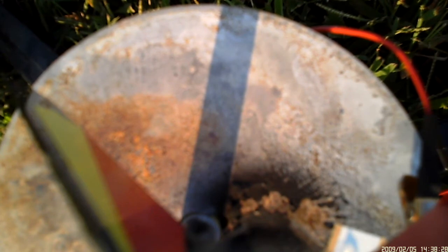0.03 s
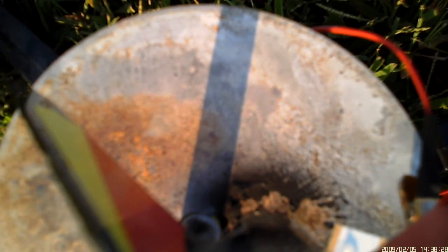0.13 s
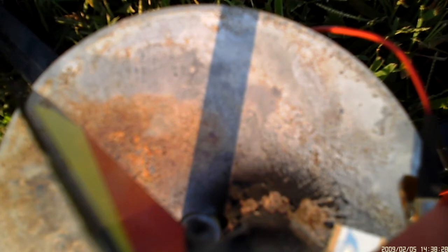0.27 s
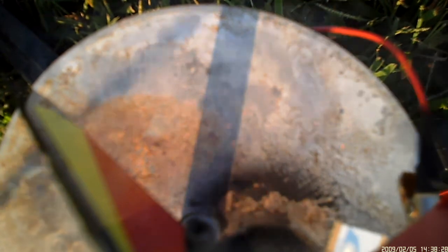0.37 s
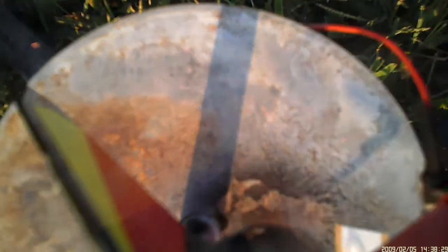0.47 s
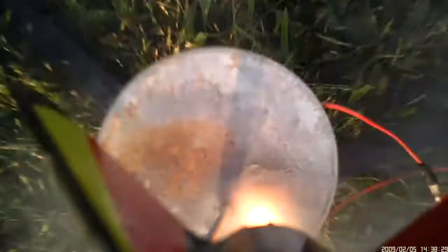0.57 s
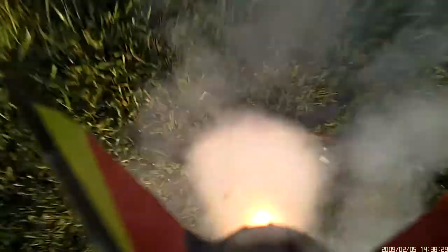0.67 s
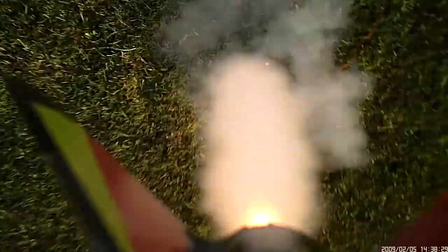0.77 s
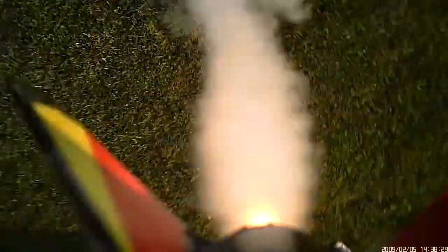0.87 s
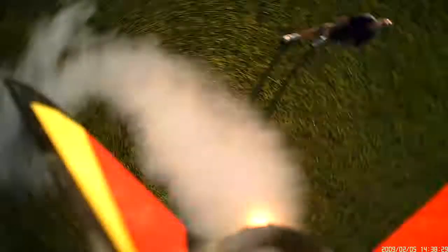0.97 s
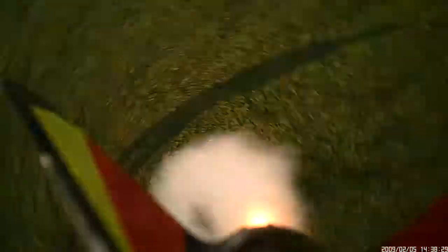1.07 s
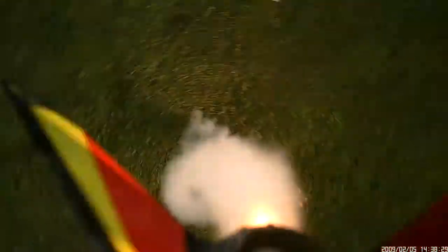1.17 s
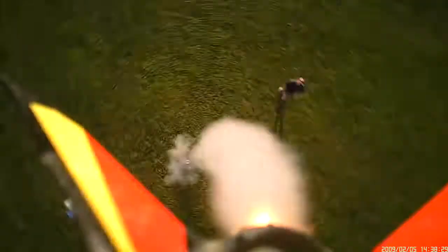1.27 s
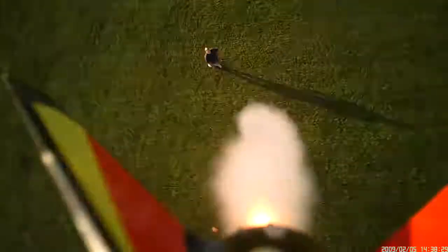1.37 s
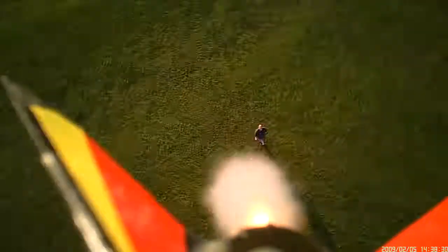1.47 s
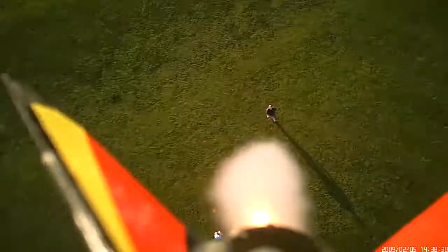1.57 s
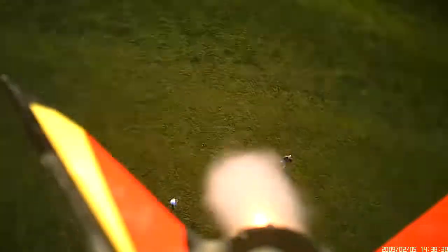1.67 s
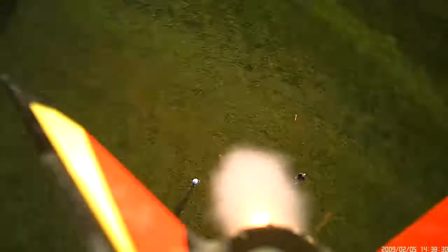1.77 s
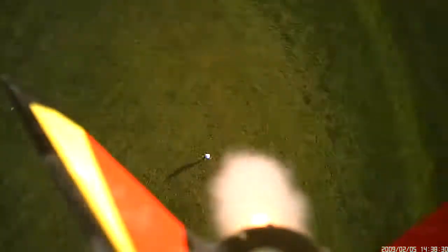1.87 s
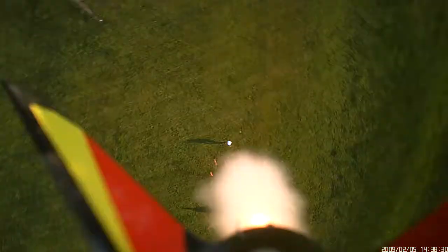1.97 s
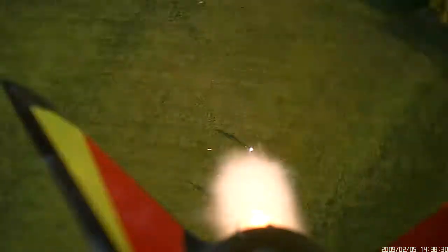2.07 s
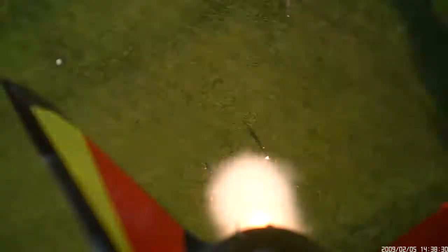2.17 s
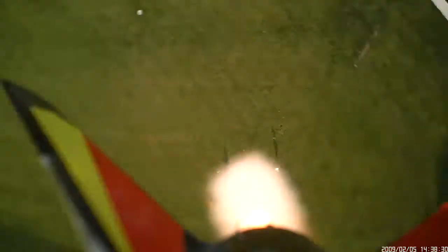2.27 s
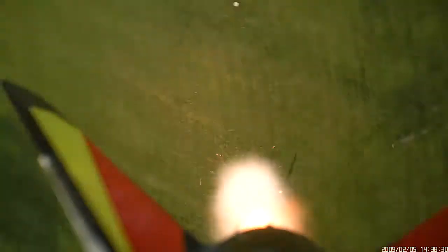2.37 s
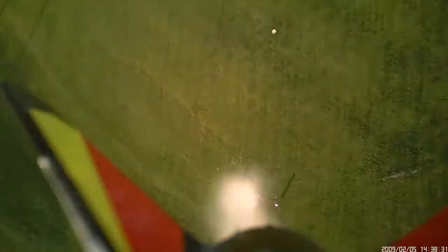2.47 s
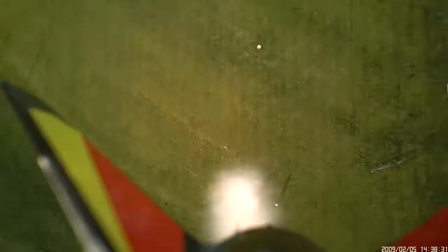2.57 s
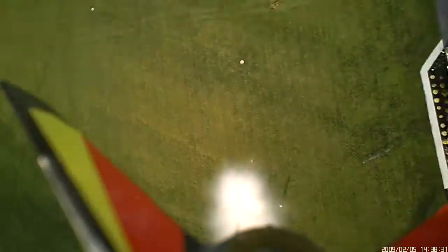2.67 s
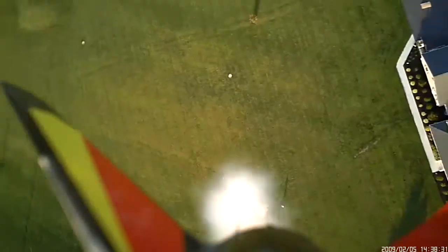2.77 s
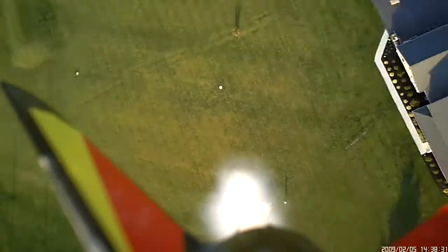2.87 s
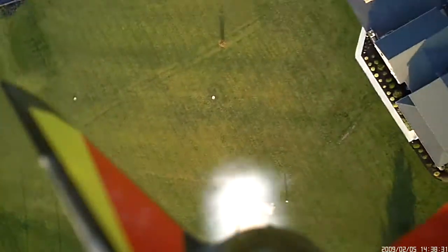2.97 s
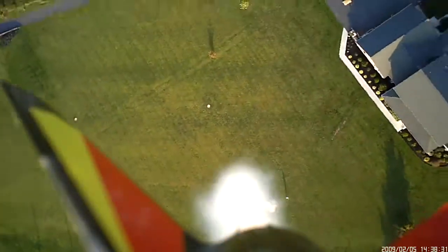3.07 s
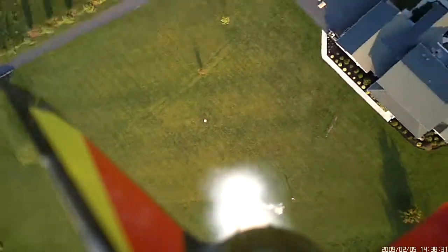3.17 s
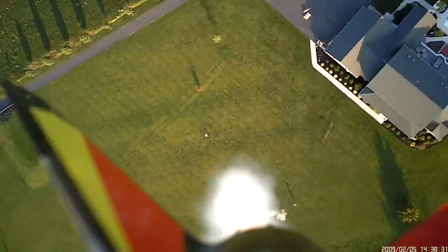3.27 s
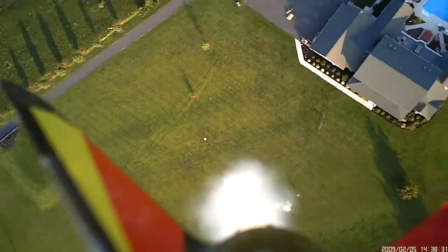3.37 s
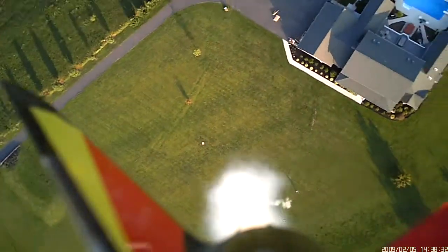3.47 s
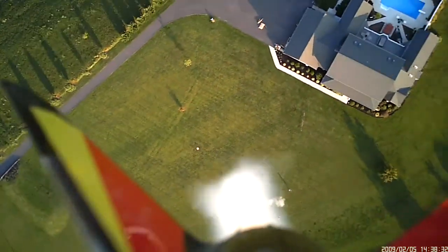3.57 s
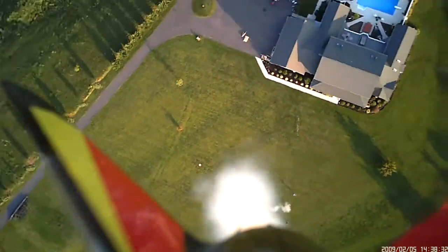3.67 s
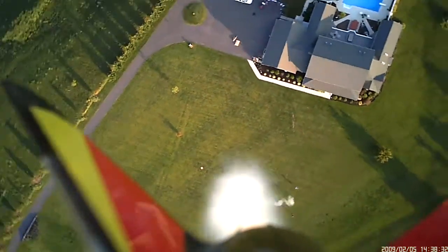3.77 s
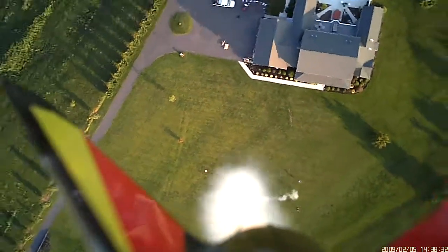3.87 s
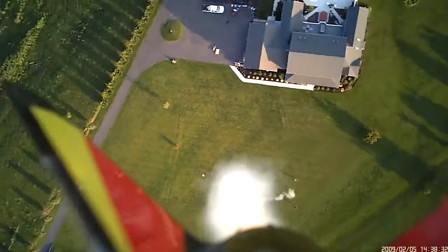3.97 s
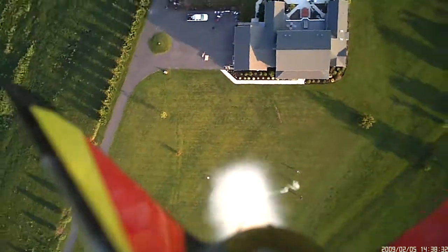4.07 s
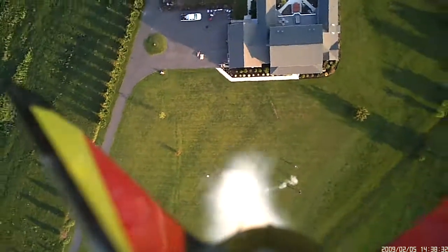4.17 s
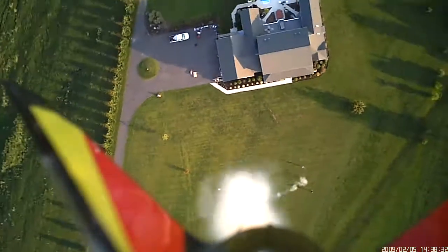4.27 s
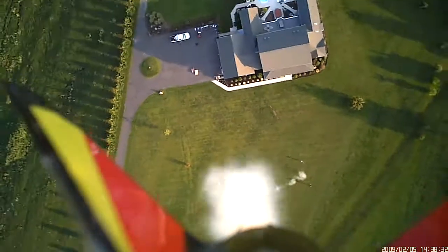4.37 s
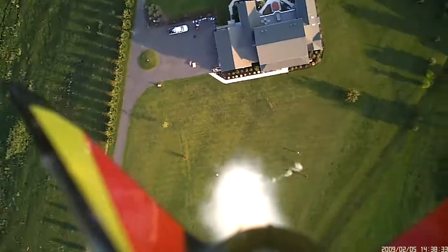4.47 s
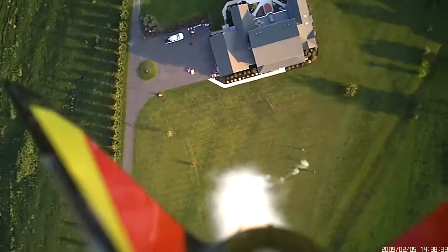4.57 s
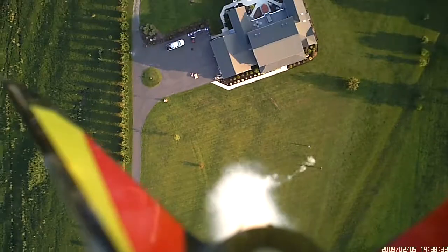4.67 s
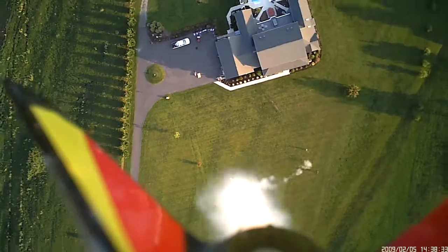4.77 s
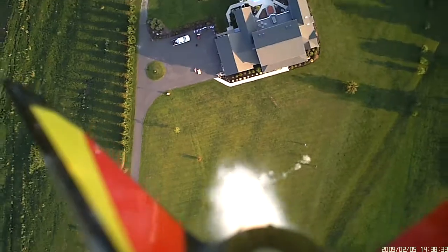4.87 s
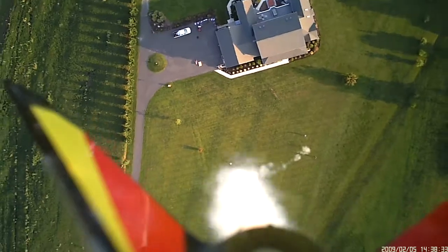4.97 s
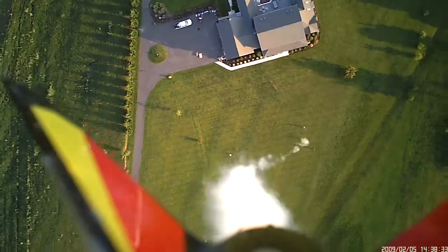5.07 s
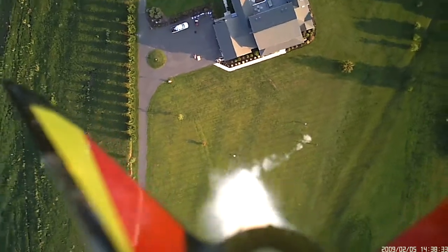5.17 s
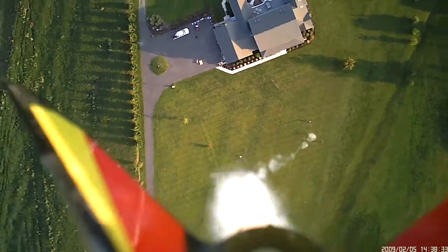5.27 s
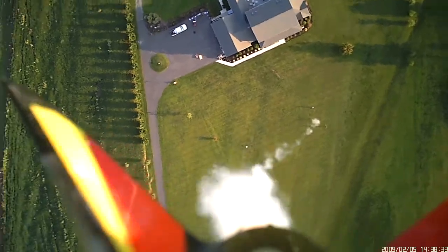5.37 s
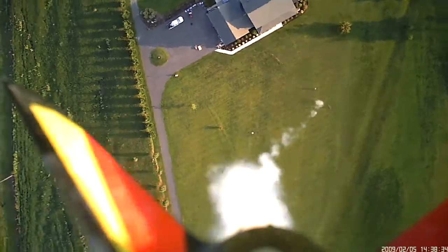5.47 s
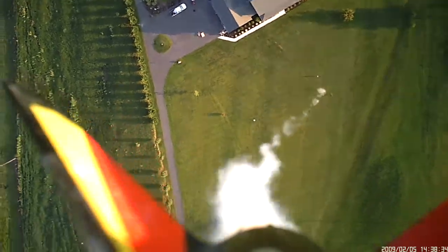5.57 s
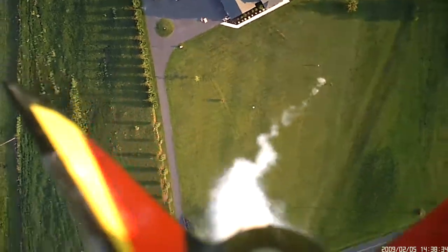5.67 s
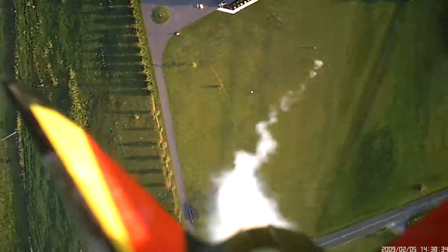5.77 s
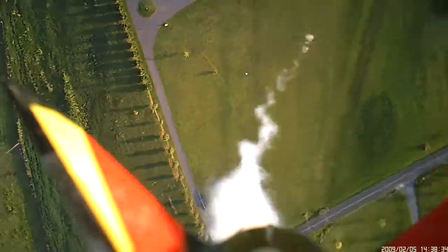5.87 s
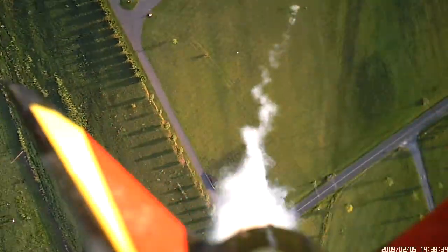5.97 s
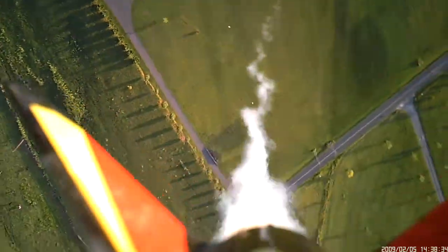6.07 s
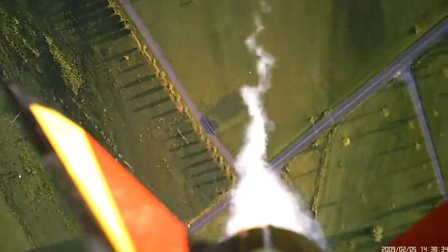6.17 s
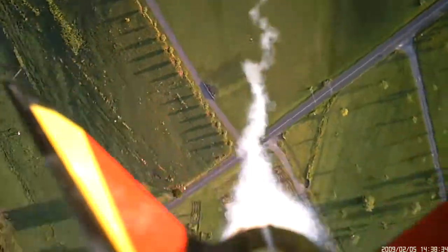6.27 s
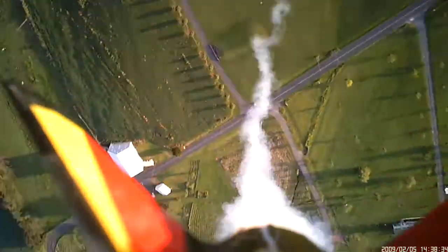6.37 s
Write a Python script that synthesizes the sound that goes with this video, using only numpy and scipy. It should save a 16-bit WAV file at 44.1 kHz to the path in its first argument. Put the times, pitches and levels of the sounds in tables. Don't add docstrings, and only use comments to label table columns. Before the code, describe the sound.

A model rocket igniter spits and bangs, then harsh hiss swells into a clipped, buffeting wind roar that dulls and fades as the rocket slows.

```python
import sys
import numpy as np
from scipy import signal
from scipy.fft import rfft, irfft
from scipy.io import wavfile
from scipy.ndimage import uniform_filter1d

SR = 44100
rng = np.random.default_rng(int(sys.argv[2]) if len(sys.argv) > 2 else 0)


def wrap_up_sound(samples):
    columns = np.atleast_2d(samples).T
    tamed = np.clip(columns, -1, 1)
    steps = np.round(tamed * 32767).astype(np.int16)
    wavfile.write(sys.argv[1], SR, steps)


def nominal_scale(level):
    x = np.asarray(level, float) / 20
    return 10 ** x


N = 283033

# frequency_hz [Hz], level_db [dB per Hz]
ROAR_SPECTRUM = [(30, -1.5), (300, -4), (700, -1.5), (1600, 1), (2200, -1.5), (4000, -8.5), (8000, -17),
                 (14500, -30), (16000, -38)]
# centre_hz [Hz], width_hz [Hz], gain_db [dB]
PORT_MODES = [(1490, 1970, 4.5), (2576, 1380, -10.5), (3820, 600, 4.5), (6130, 220, 0.5), (7680, 690, 8.5),
              (9830, 300, 8), (12600, 500, 0), (13800, 900, 11)]
# start_s [s], length_s [s], centre_hz [Hz], width_hz [Hz], gain_db [dB]
SURGE = (0.96, 0.27, 610, 1000, 10.8)
# time_s [s], level_db [dB]
RUSH = [(.345, -25.5), (.5, -16), (.555, -9), (.57, -5.5), (.75, -9.5), (.9, -6.5), (1.1, -2), (1.45, -0.5),
        (1.75, 2), (2.7, 2.5), (3, 0.6), (3.6, -3), (4.2, -7.5), (4.8, -13.5), (5.3, -16.5), (5.7, -16.5),
        (6.2, -14.5), (6.42, -24)]


def roar(t):
    hz, frames = stft_grid(512)
    yaw_db = -4 * ramp(frames, 5.2, 0.2)
    slope_db = -3.5 + 0.5 * curve(RUSH, 1, frames) + yaw_db
    slope_db = np.maximum(slope_db, -19)
    port_db = bells_db(PORT_MODES, hz) * np.clip(0.55 - 0.051 * slope_db, 0, 1.05)

    surge_s, surge_length_s = SURGE[:2]
    surge_decay = np.exp(-(np.maximum(frames - surge_s, 0) / surge_length_s) ** 2)
    surge_db = bells_db([SURGE[2:]], hz) * ramp(frames, surge_s, 0.03) * surge_decay

    treble_db = (slope_db + 4.2) * np.log2(np.maximum(hz / 1900, 1))
    colour_db = spectrum_db(ROAR_SPECTRUM, hz) + port_db + surge_db + treble_db
    rush = turbulence(colour_db, (600, 2200), 0.63, 0.44, 26, size=512)

    tip_s = 5.68
    lee_db = -9 * ramp(t, tip_s, 0.14) - 17 * np.maximum(t - tip_s, 0)
    steady_suction = 0.03
    return (rush - steady_suction) * nominal_scale(curve(RUSH, 1, t) + lee_db + 0.43)


# frequency_hz [Hz], level_db [dB per Hz]
BUFFET_SPECTRUM = [(10, 0), (40, -1.5), (100, -1.5), (250, -5.5), (500, -10), (1000, -17), (3000, -64),
                   (16000, -80)]
# time_s [s], height [full scale], length_s [s]
LURCHES = [
    (.944, -1.0, .036),
    (.969, 1.15, .022),
    (1.0, -.45, .025),
    (1.035, .5, .03),
    (1.22, .5, .02),
    (5.805, .3, .012),
    (6.076, .25, .012),
    (6.117, .15, .012),
]


def buffeting(t):
    hz, frames = stft_grid(2048)
    deep_db = gusts_db(frames, column=3) * np.log2(np.maximum(300 / (hz + 10), 1))
    lumps = turbulence(spectrum_db(BUFFET_SPECTRUM, hz) + deep_db, (25, 500), 0.82, 1.0, 2, size=2048)
    lurch = sum(height * np.exp(-(3.1 * (t - s) / length) ** 2) for s, height, length in LURCHES)
    liftoff_s, grown_s = RUSH[0][0], 1.61
    young_db = -21.5 * (1 - ramp(t, liftoff_s, grown_s - liftoff_s))
    level_db = -4.5 + 0.8 * curve(RUSH, 1, t) + young_db + gusts_db(t, column=2)
    return lumps * nominal_scale(level_db) + lurch


# time_s [s], length_s [s], extra_level_db [dB], extra_depth_db [dB per octave]
GUSTS = [
    (.53, .04, 13, 1),
    (.7, .06, -4, -5),
    (0.976, .1, 12, -2.5),
    (1.446, .1, 3.5, .6),
    (2.498, 0.13, 2.5, 1.3),
    (4.197, 0.22, -2.5, -0.2),
    (4.503, 0.54, -1.5, -0.6),
    (5.5, 0.36, 4, -1.5),
    (5.71, 0.043, 2, -2.5),
    (5.81, 0.054, 5, -1),
]


def gusts_db(t, column):
    return sum(row[column] * np.exp(-((t - row[0]) / row[1]) ** 2) for row in GUSTS)


# centre_hz [Hz], width_hz [Hz], gain_db [dB]
HOUSING_MODES = [(1560, 790, 11), (2530, 650, -17), (3930, 1010, 12.5), (4850, 860, -7), (6110, 320, -16),
                 (6980, 1350, 9), (7730, 220, -7), (8400, 600, 0.5), (9660, 740, -8.5), (11500, 1500, 2),
                 (12900, 530, -13), (13850, 740, 4)]
# frequency_hz [Hz], level_db [dB per Hz]
JET_SPECTRUM = [(30, -13), (500, -22), (1000, -5.5), (2000, -3), (4000, -3), (7000, -7), (10000, -8.5),
                (14000, -10.5), (15000, -20), (16000, -36)]


def jet(t):
    hz, frames = stft_grid(512)
    tilt_db = burn(frames)[1] * np.log2(np.maximum(hz / 4000, 1))
    colour_db = spectrum_db(JET_SPECTRUM, hz) + bells_db(HOUSING_MODES, hz) + tilt_db
    hiss = turbulence(colour_db, (3200, 4600), 0.39, 0.78, 9.7, size=512)
    return hiss * nominal_scale(burn(t)[0] + 1.7)


# time_s [s], hiss_level_db [dB]
THRUST = [(.345, -15), (.38, -22), (.47, -6), (.58, -2.5), (.7, -10.5), (.92, -12.5), (1.0, -12.5),
          (1.3, -18), (1.95, -11), (2.25, -6), (2.7, -17)]


def burn(t):
    ignition_s, burnout_s = THRUST[0][0], THRUST[-1][0]
    motor_db = curve(THRUST, 1, t) - 14 * np.maximum(t - burnout_s, 0)
    delay_db = peak_db(t, 6.165, 0.13, level_db=-21, rise=14.5, fall=14)
    delay_db = delay_db - 23.5 * np.maximum(5.1 - t, 0)
    flame_db = np.interp(t, [ignition_s, 0.48, 1.5, 1.85], [-3, 3.5, 3.5, -1])
    delay_tilt_db = -2
    return np.maximum(motor_db, delay_db), np.where(motor_db > delay_db, flame_db, delay_tilt_db)


# frequency_hz [Hz], level_db [dB per Hz]
SPIT_SPECTRUM = [(30, -30), (700, -20.5), (1500, -10.5), (2600, -3.5), (4000, -12), (5200, -7), (7000, -2),
                 (8400, -3.5), (10000, -20), (11800, -13), (13700, -5), (15200, -14), (16000, -24)]
# start_s [s], pitch_hz [Hz], level_db [dB], t60_s [s]
BANG_MODES = [
    (.3125, 13500, -22, .006),
    (.3142, 7000, -20, .006),
    (.3165, 12500, -20, .008),
    (0.3198, 1610, -9, .012),
    (.3262, 1460, 1, 0.019),
    (0.329, 130, -18, .06),
    (.3275, 400, -14, 0.018),
    (.3268, 850, -7, 0.027),
    (.33, 2960, -2.5, 0.068),
    (.3305, 3450, 1, 0.042),
]


def igniter(t):
    hz, frames = stft_grid(256)
    frames = frames[frames < 0.6]
    tilt_db = smoulder(frames)[1] * np.log2(hz / 4000 + 0.12)
    colour_db = spectrum_db(SPIT_SPECTRUM, hz) + 0.63 * bells_db(HOUSING_MODES, hz) + tilt_db
    spit = turbulence(colour_db, (500, 16000), 3.6, 1.7, 2.4, size=256)
    t = t[:len(spit)]
    spit = spit * nominal_scale(smoulder(t)[0])
    rings = 0
    for start, pitch, level_db, t60 in BANG_MODES:
        decay = nominal_scale(level_db - 60 * abs(t - start) / t60)
        rings = rings + (t > start) * decay * np.sin(2 * np.pi * pitch * (t - start))
    return np.pad(spit + rings, (0, N - len(spit)))


# start_s [s], hold_s [s], level_db [dB], brightness_db [dB per octave], release_db [dB per s]
PUFFS = [
    (.14, .035, -63, 8, 1100),
    (.275, .025, -56, -1, 900),
    (.3198, .006, -9, 9.5, 3000),
    (.3278, .0108, -3, -5.3, 3700),
    (.345, .095, -13.5, -1, 290),
]


def smoulder(t):
    puff_rise = 6000
    levels = [peak_db(t, start, hold, db, puff_rise, fall) for start, hold, db, _, fall in PUFFS]
    levels.append(peak_db(t, 0.3188, 0, level_db=-22, rise=950, fall=puff_rise))
    levels = np.array(levels)
    fuse_tilt_db = 3
    tilts_db = np.array([row[3] for row in PUFFS] + [fuse_tilt_db])
    return levels.max(axis=0), tilts_db[levels.argmax(axis=0)]


# frequency_hz [Hz], level_db [dB per Hz]
FIELD_SPECTRUM = [(8.8, -29), (15, 6), (74, -10.5), (258, -19), (388, -21), (475, -22), (1390, -26.5),
                  (5940, -36), (11300, -38), (15500, -36)]


def field():
    hz, frames = stft_grid(2048)
    colour_db = spectrum_db(FIELD_SPECTRUM, hz) + 0 * frames
    return nominal_scale(-42) * turbulence(colour_db, (0, SR), 1.3, 0.6, 2.6, size=2048)


def turbulence(shape_db, band_hz, patchy_db, flicker_db, flicker_frames, size):
    bins, frames = shape_db.shape
    real, imag, patches = rng.standard_normal((frames, bins, 3)).T
    patches = uniform_filter1d(patches, size=9, axis=0)
    patches = evened(uniform_filter1d(patches, size=12, axis=1))
    flicker = evened(uniform_filter1d(rng.standard_normal(frames), max(int(flicker_frames), 1)))
    gain, hz = nominal_scale(shape_db), stft_grid(size)[0][:, 0]
    in_band = (hz > band_hz[0]) & (hz < band_hz[1])
    gain = gain / np.sqrt((gain[in_band] ** 2).sum(axis=0))
    spectra = (real + 1j * imag) * gain * nominal_scale(patchy_db * patches + flicker_db * flicker)
    return signal.istft(spectra, nperseg=size, noverlap=size * 3 // 4)[1][:N] * np.sqrt(3 / 4)


def bells_db(modes, hz):
    return sum(db / (1 + (2 * (hz - f) / width) ** 2) for f, width, db in modes)


def spectrum_db(points, hz):
    f, db = np.transpose(points)
    return np.interp(np.log(hz + 1), np.log(f + 1), db)


def stft_grid(size):
    hop = size // 4
    return np.fft.rfftfreq(size, 1 / SR)[:, None], np.arange(N // hop + 5) * hop / SR


def curve(rows, column, t):
    rows = np.array(rows)
    return np.interp(t, rows[:, 0], rows[:, column])


def peak_db(t, start, hold, level_db, rise, fall):
    return level_db - rise * np.maximum(start - t, 0) - fall * np.maximum(t - start - hold, 0)


def ramp(t, start, length):
    return np.clip((t - start) / length, 0, 1)


def evened(x):
    return x / np.sqrt(np.mean(x ** 2) + 1e-20)


def scene():
    t = np.arange(N) / SR
    lit = ramp(t, 0.335, 0.0076)
    moving = ramp(t, 0.36, 0.05)
    mix = lit * (roar(t) + jet(t)) + moving * buffeting(t) + igniter(t) + field()
    return np.tile(mix, (2, 1))


# time_s [s], low_hz [Hz], high_hz [Hz]
SWAPS = [(.11, 14400, 15500), (.505, 5700, 7600), (.505, 13050, 14450), (.598, 11650, 13780),
         (.598, 14400, 15700), (.807, 4300, 5200), (1.248, 6880, 8270), (1.248, 13050, 14500),
         (2.223, 4700, 7600), (2.525, 14450, 15700), (2.78, 8250, 10300), (2.78, 14400, 15650),
         (3.361, 13050, 14450), (3.64, 13750, 15200), (4.15, 7570, 8950), (4.731, 4270, 5180),
         (4.731, 13050, 14400), (4.754, 6900, 9000), (5.845, 6250, 7600)]


def swap_bands(x):
    out, size = x.copy(), 2048
    window, hz = signal.windows.tukey(size, 0.7), np.fft.rfftfreq(size, 1 / SR)
    noises = rng.standard_normal((len(SWAPS), 2, size))
    for (time, low, high), noise in zip(SWAPS, noises):
        middle = round(time * SR)
        part = slice(middle - size // 2, middle + size // 2)
        band = (hz > low) & (hz < high)
        old = irfft(rfft(out[:, part]) * band)
        new = evened(irfft(rfft(noise) * band)) * old.std() * nominal_scale(-1.5)
        out[:, part] += np.sqrt(window) * new - (1 - np.sqrt(1 - window)) * old
    return out


def starve_top(x):
    frame = 1024
    highpass = signal.firwin(301, 15250, pass_zero=False, fs=SR)
    top = signal.oaconvolve(x, highpass[None], "same")
    frames = -(-N // frame)
    power = uniform_filter1d(top[0] ** 2, size=2048)[::frame]
    level_db = 10 * np.log10(abs(power) + 1e-14) + 2 * rng.standard_normal(frames)
    weak = (level_db < -62) & (np.arange(frames) * frame / SR > 1)
    return x - top * uniform_filter1d(np.repeat(weak * 1., frame)[:N], size=256)


def roll_off(x):
    return signal.sosfilt(signal.butter(12, 15670, fs=SR, output="sos"), x)


def record(dry):
    ceiling = 0.69
    clipped = np.clip(dry, -ceiling, ceiling)
    limited = signal.oaconvolve(clipped, signal.firwin(61, 16400, fs=SR)[None], "same")
    mix = starve_top(swap_bands(limited))
    return roll_off(mix)


dry = scene()
out = record(dry)
wrap_up_sound(out)
```